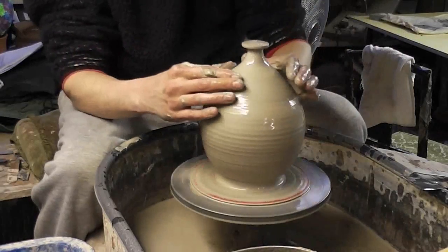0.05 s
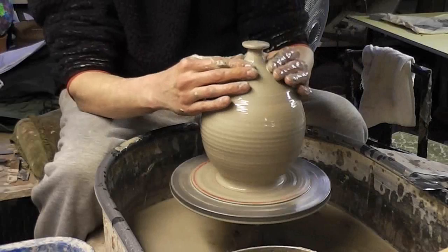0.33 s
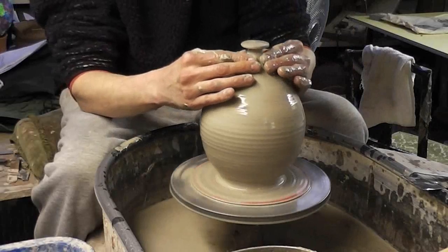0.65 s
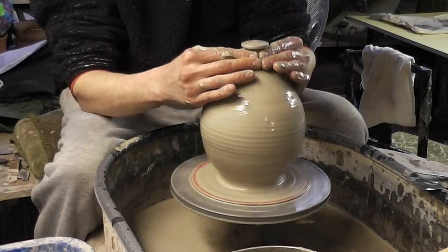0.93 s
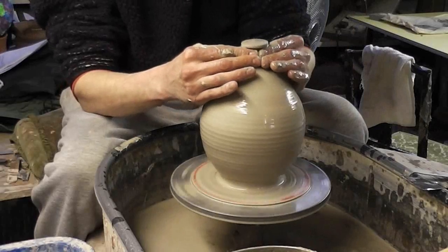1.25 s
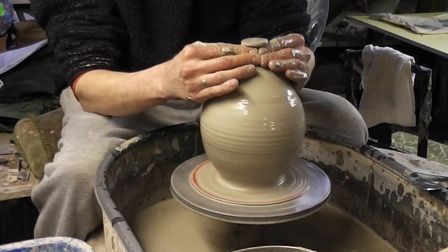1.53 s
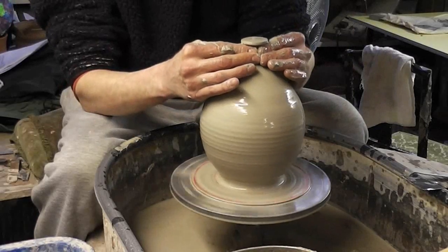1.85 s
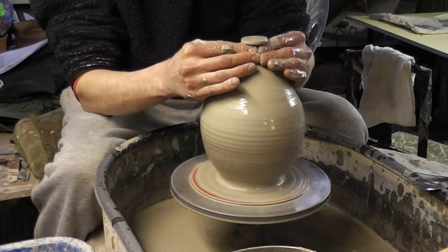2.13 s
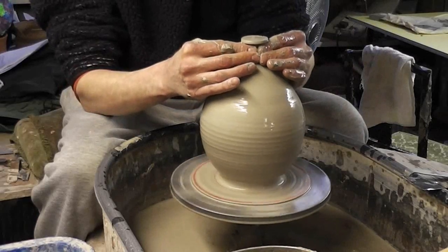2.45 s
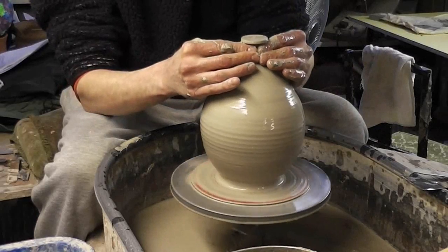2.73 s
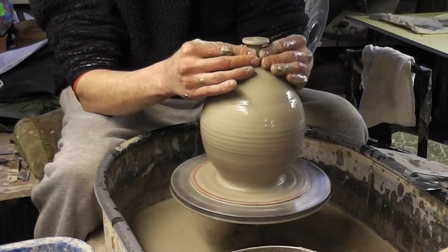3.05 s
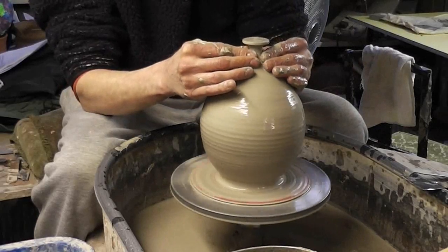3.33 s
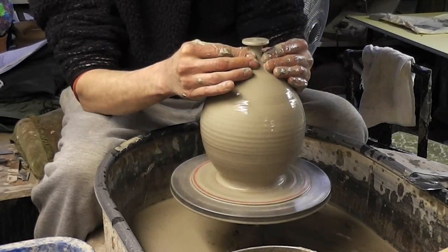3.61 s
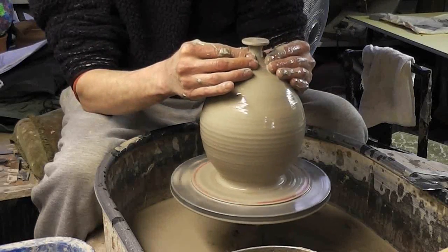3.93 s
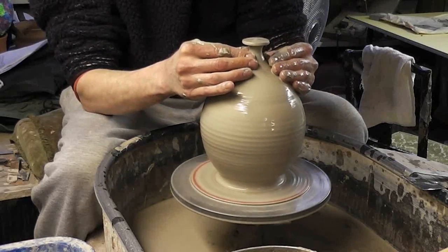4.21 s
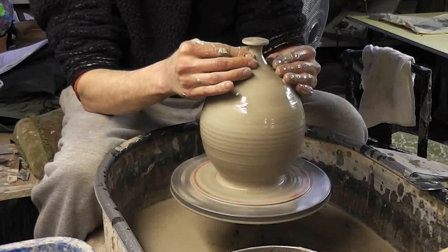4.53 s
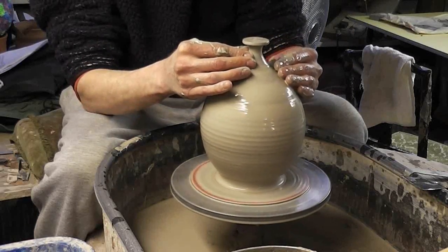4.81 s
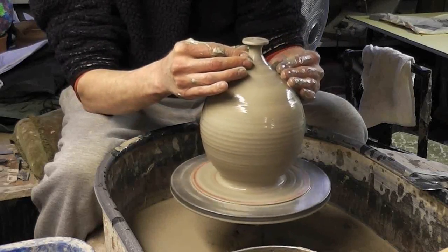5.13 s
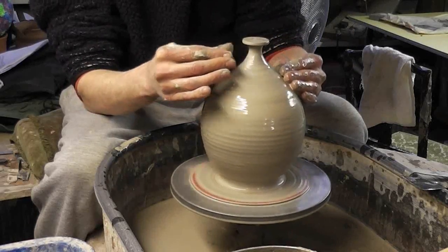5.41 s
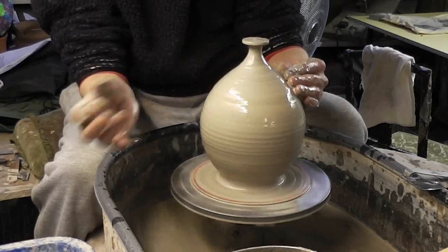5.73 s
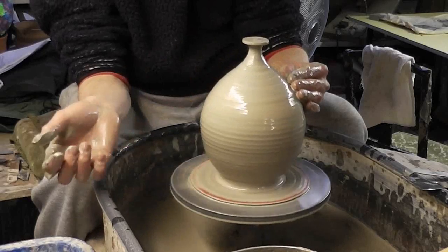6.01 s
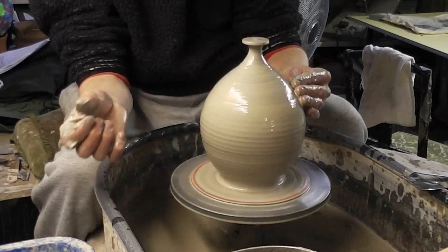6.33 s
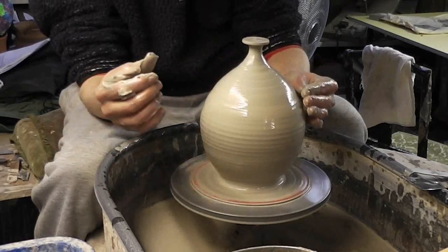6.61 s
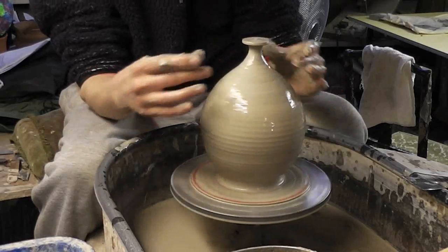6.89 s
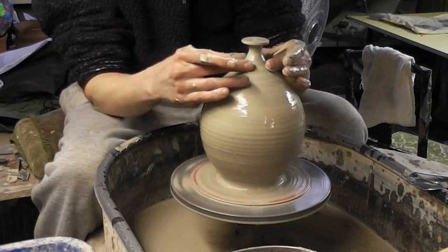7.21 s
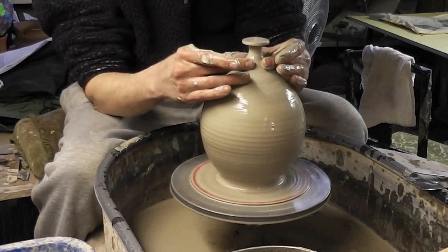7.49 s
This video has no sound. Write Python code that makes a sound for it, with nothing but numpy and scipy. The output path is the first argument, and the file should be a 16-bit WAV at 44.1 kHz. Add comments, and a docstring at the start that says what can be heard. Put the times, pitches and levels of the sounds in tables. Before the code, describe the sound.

An electric potter's wheel runs at a steady speed for the whole seven and a half seconds, close by in a small workshop. Its low motor hum has a slight throb, and the drive rumbles through the frame and tray, pulsing six or seven times a second with an occasional slightly stronger groan, clearest around 6.5 seconds. Much fainter, wet fingers slide on the spinning clay. A fine, crackly hiss with tiny wet ticks comes and goes during the first 1.5 seconds, then recedes. Brief soft scuffs and ticks follow, with a sharper tick at about 2.2 seconds and light rubs around 3 seconds and between 5 and 6 seconds. A duller scuff comes near 6.9 seconds, and the soft sliding returns until the end. The hand sounds carry a very short room echo, and a faint even hiss lies underneath.

```python
"""Electric potter's wheel at steady speed, close by, in a small workshop.
The motor hums at twice mains frequency with a slow throb. The drive rumbles through frame and tray,
swelling with each pulley turn. Wet fingers slide on the spinning clay: faint hiss, scuffs and ticks
of slip, with a short room tail. A steady hiss lies underneath."""
import sys
import numpy as np
from scipy import signal
from scipy.fft import irfft, next_fast_len
from scipy.io import wavfile
from scipy.ndimage import uniform_filter1d

SR = 44100
rng = np.random.default_rng(int(sys.argv[2]) if len(sys.argv) > 2 else 0)


def unload_wav(signal):
    """Save mono or channel-first audio to the path in sys.argv[1] as 16-bit WAV at rate SR, clipped to [-1, 1]."""
    wavfile.write(
        sys.argv[1],
        SR,
        np.round(np.clip(np.atleast_2d(signal).T, -1, 1) * 32767).astype(np.int16),
    )


N = 332955
TIME = np.arange(N) / SR
HUM_HZ, THROB_HZ, PULLEY_HZ, HEAD_HZ = 100.035, 4.665, 6.672, 1.84

# Motor hum: harmonic, level/dB, lag/rad, throb/dB, its peak t/s, ripple/dB, its peak t/s, head swell/dB
HUM_PARTIALS = [(1, -23, 0.24, 0.34, 0.038, 0.55, 0.028, -0.17),
                (3, -29.5, 1.68, 1.5, .21, 1.7, 0.055, 1.56), (4, -56, 1.2, 6, 0.12, 0, 0.031, -0.5)]
# Motor and drive tones: f/Hz, level/dB
DRIVE_TONES = [(79.2, -48), (84, -45), (93.3, -47.5), (113.4, -47), (114, -47.5), (142, -50), (981, -64),
               (1091, -61.5), (1185, -65.5), (1599, -71), (4339, -76.5), (7510, -87), (12500, -91)]
# Beating pair of housing tones: f/Hz, level/dB
HOUSING_TONES = [(195.4, -40), (200.2, -37)]
# Gain at the housing resonance: t/s, gain/dB
HOUSING_GAIN = [(0, 1), (.7, 2), (2.45, 4), (2.8, 1), (3.6, 1.5), (4.2, -3), (4.6, 0.5), (7.55, 2)]
# Frame and tray resonances: f/Hz, width/Hz, level/dB, swell per pulley turn/dB, its peak t/s
FRAME_MODES = [(110, 13, -44, -1, 0.02), (137, 19, -43, 1.5, 0.16), (179.5, 16, -41, 3, 0.07),
               (198.8, 12.3, -41.5, 4.5, 0.036), (217.3, 15, -40.5, -1.5, 0.068),
               (265, 33, -43.5, 0.5, 0.069), (307.4, 6.1, -36.5, 1.6, 0.034),
               (371.7, 16.4, -47.5, 1.1, .064), (407.3, 10, -54, -3, 0.076), (467, 16, -60, 9, 0.1),
               (607, 24.3, -49, 2, 0.05), (715, 30, -55, 8, 0.07), (855, 20, -59, 1.5, 0.086),
               (979, 14, -65, -2.5, .055), (1087, 79, -55.5, 2.5, 0.059), (1194, 24, -57.5, 5, 0.093),
               (1319, 15, -60.5, 0.5, 0.046), (1476, 24, -60.5, 0, 0.066), (1590, 14, -73, 2, 0.073),
               (3395, 60, -79, 5, 0.043), (4355, 90, -77.5, -2, 0.084), (6560, 160, -76.5, 0, .06),
               (7580, 260, -77, -0.5, 0.077)]
# Drag on the drive, slow part of the shake: t/s, relative level/dB
DRIVE_DRAG = [(0, 0), (2.5, -1.1), (3.3, 0), (4.1, 0), (5.4, 0.4), (7.55, 0)]
# Drive grinding: f/Hz, relative density/dB
GRIND_SPECTRUM = [(20, -18), (55, -2.5), (90, -3), (340, 5), (500, 0), (800, -5.5), (1400, -8.5),
                  (1800, -14.5), (2600, -25.5), (4300, -28), (4800, -45.5), (6300, -39), (9000, -45),
                  (16000, -53)]
# Tray groan: f/Hz, relative density/dB
GROAN_SPECTRUM = [(400, -30), (560, -9), (610, 3.5), (665, -4), (720, -9.5), (800, -18), (1300, -20.5),
                  (2500, -56.5), (16000, -91.5)]
# Hard pulley catches, louder groans: peak t/s, level/dB
PULLEY_CATCHES = [(.18, -42), (1.11, -39), (1.99, -41), (3.17, -41), (3.47, -41), (5.27, -40), (6.48, -36),
                  (6.92, -40)]
# Stereo image of wheel and hands: f/Hz, left-right correlation
STEREO_CORRELATION = [(30, .85), (100, 0.94), (300, 0.98), (600, 0.94), (1200, 0.85), (2200, 0.67),
                      (4000, 0.62), (8000, 0.25)]
# Fingers sliding on clay: t/s, level/dB
SLIDE_LEVEL = [(0, -56), (.2, -60), (.35, -63), (.5, -71), (1.0, -68), (1.25, -62), (1.5, -78.5),
               (6.6, -77), (7.0, -69), (7.55, -64)]
# Wet skin friction: f/Hz, relative density/dB
SLIDE_SPECTRUM = [(1500, -19.5), (3500, 3.5), (4900, -2), (6500, 0.5), (9000, -3), (12000, -4), (16000, -9)]
# Snapping films of slip: t/s, level/dB, f/Hz, half-width/oct, T60/s
SLIP_TICKS = [(.077, -38.5, 9500, .35, 0.013), (.212, -44, 7200, .16, .025), (.242, -45, 11000, .22, .025),
              (.600, -44, 7650, 0.26, .03), (.619, -44, 10600, .55, .018), (.704, -42.5, 5970, 0.58, .06),
              (.792, -48, 10000, 0.63, .025), (1.247, -48, 7660, .18, .03), (1.31, -52, 5000, .25, .04),
              (1.736, -52, 10400, .16, .03), (2.244, -34.5, 11400, 0.85, .012),
              (2.244, -44.5, 6150, 0.2, 0.073), (3.025, -54, 10400, .14, .04),
              (3.141, -47, 9500, .5, 0.023), (5.005, -48, 6000, .8, .05), (6.906, -53, 7200, .25, .05),
              (7.043, -49, 7900, .1, .03)]
# Distinct hand scuffs: t/s, level/dB, decay/s, tilt/(dB/oct)
HAND_SCUFFS = [(0.884, -46, 0.0097, -7), (0.914, -49, .025, -10), (1.216, -50, .045, -7),
               (1.606, -49, 0.039, -7), (1.965, -50, 0.015, -6), (2.091, -50, 0.042, -5.5),
               (3.0, -46, 0.031, -11), (3.454, -50.5, 0.017, -3), (4.379, -52.5, 0.052, -3),
               (4.504, -50, .025, -5), (4.995, -53, 0.049, -4), (5.257, -46.5, 0.02, -4.5),
               (5.311, -45, 0.046, -7), (5.894, -49, .03, -7), (6.041, -49, .03, -21),
               (6.454, -51, .025, -4), (6.625, -55, 0.036, -1.5), (6.903, -47.5, .03, -7),
               (6.935, -39, 0.032, -24)]
# Scuff before tilt: f/Hz, relative density/dB
SCUFF_SPECTRUM = [(400, -9), (1200, 3), (2500, 2), (4200, 1.5), (4900, -6), (6500, 1.5), (10000, -4.5),
                  (16000, -15)]
# Background hiss: f/Hz, relative density/dB
HISS_SPECTRUM = [(100, 4), (2000, -4), (4300, 4.5), (4900, -0.5), (5600, 4), (7100, 0), (7600, 2.5),
                 (8500, -1), (12300, -2), (12900, 1.5), (13600, -3), (16000, -1.5)]


def motor(lag_peak_s=0.1204, head_load_s=0.069):
    """Magnetic hum, swinging in phase and level with each throb, plus drive and housing tones."""
    sag = ((1 + cycle(THROB_HZ, lag_peak_s)) / 2) ** 4
    out = np.zeros(N)
    for harmonic, db, lag_rad, throb_db, throb_s, ripple_db, ripple_s, head_db in HUM_PARTIALS:
        swing_db = throb_db * cycle(THROB_HZ, throb_s) + ripple_db * cycle(2 * THROB_HZ, ripple_s)
        swing_db += head_db * cycle(HEAD_HZ, head_load_s)
        out += amp(db + swing_db) * np.cos(2 * np.pi * harmonic * HUM_HZ * TIME - lag_rad * sag)
    for hz, db in DRIVE_TONES + HOUSING_TONES:
        out += amp(db) * housing(hz) * np.sin(2 * np.pi * (hz * TIME + rng.random()))
    return np.sqrt(2) * out


def housing(hz, centre_hz=198, width_hz=40, swell_db=0.9, peak_s=0.19):
    """Gain near the housing resonance; swells once per wheel-head turn."""
    level_db = curve(HOUSING_GAIN) + swell_db * cycle(HEAD_HZ, peak_s)
    return amp(level_db * np.exp(-((hz - centre_hz) / width_hz) ** 2))


def pulley_shake(depth=0.8):
    """Rolling-contact level swing in dB: drag, random lumps, a rough surface repeating each turn."""
    drag = curve(DRIVE_DRAG) + 1.39 * wander(top_hz=5)
    jolts = uniform_filter1d(uniform_filter1d(rng.standard_normal(N), size=900), size=400)
    lumps = unit(jolts - uniform_filter1d(jolts, size=3500))  # shorter than a turn
    surface = unit(sum(cycle(k * PULLEY_HZ, rng.random()) / np.sqrt(k) for k in range(5, 32)))
    ripple = 1.5 * cycle(16 * PULLEY_HZ, 0)
    return depth * (drag + lumps + surface + ripple)


def frame(shake_db, full_shake_hz=800):
    """Frame and tray modes, each peaking at its own point of the pulley turn; high ones shake most."""
    out = np.zeros((2, N))
    smooth_db = uniform_filter1d(shake_db, size=800)  # ringing smooths fast jolts
    for hz, width_hz, db, swell_db, peak_s in FRAME_MODES:
        ring = noise(lambda f: 1 / np.sqrt(1 + (2 * (f - hz) / width_hz) ** 4))
        swing_db = swell_db * cycle(PULLEY_HZ, peak_s) + smooth_db * min(hz / full_shake_hz, 1)
        out += amp(db) * housing(hz) * ring * unit(amp(swing_db))
    return out


def grind(shake_db, level_db=-38.5, swell_db=1.23, peak_s=0.051):
    """Broadband drive noise; swells once per pulley turn."""
    swing_db = shake_db + swell_db * cycle(PULLEY_HZ, peak_s)
    return amp(level_db) * unit(noise(lambda f: amp(lookup(GRIND_SPECTRUM, f))) * amp(swing_db))


def groans(level_db=-47.5, spread_db=2, first_s=0.038, jitter_s=0.011, length_s=0.08):
    """Tray resonance: one rough burst per pulley turn, louder at the catches."""
    turns_s = first_s + np.arange(int(N / SR * PULLEY_HZ) + 1) / PULLEY_HZ
    scatter = rng.uniform(-np.sqrt(3), np.sqrt(3), (len(turns_s), 2))  # unit variance
    bursts = [(s + jitter_s * late, level_db + spread_db * loud)
              for s, (late, loud) in zip(turns_s, scatter)]
    power, swell = np.zeros((1, N)), np.hanning(round(length_s * SR))[None]
    for s, db in bursts + PULLEY_CATCHES:
        add(power, s - length_s / 2, (amp(db) * swell) ** 2)
    return np.sqrt(power) * noise(lambda f: amp(lookup(GROAN_SPECTRUM, f)))


def slide(grain_db=2.5):
    """Wet skin on clay: fine, crackling hiss."""
    grains = unit(uniform_filter1d(rng.standard_normal(N), size=70))
    friction = noise(lambda f: amp(lookup(SLIDE_SPECTRUM, f)))
    return amp(curve(SLIDE_LEVEL)) * unit(friction * amp(grain_db * grains))


def ticks(rise_s=0.001, size=6000):
    """Films of slip snap: short, high noise bursts."""
    out, t = np.zeros((2, N)), np.arange(size) / SR
    for s, db, hz, width_oct, t60_s in SLIP_TICKS:
        burst = noise(lambda f: 1 / (1 + (np.log2((f + 1) / hz) / width_oct) ** 4), size=size)
        envelope = (1 - np.exp(-t / rise_s)) * np.exp(-np.log(1000) * t / t60_s)
        add(out, s, amp(db) * burst * envelope)
    return out


def scuffs(faint_per_s=1.5, faint_db=-54.5, faint_decay_s=0.017, faint_db_per_oct=-2,
           pivot_hz=3000, rise_s=0.00085, size=12000):
    """Hands rub the clay briefly; fainter rubs fall at random times."""
    out, t = np.zeros((2, N)), np.arange(size) / SR
    onsets_s = TIME[rng.random(N) < faint_per_s / SR]
    faint = [(s, faint_db, faint_decay_s, faint_db_per_oct) for s in onsets_s]
    for s, db, decay_s, db_per_oct in HAND_SCUFFS + faint:
        def colour(f):
            octaves = np.log2(np.maximum(f, pivot_hz / 2) / pivot_hz)
            return amp(lookup(SCUFF_SPECTRUM, f) + db_per_oct * octaves)
        envelope = (1 - np.exp(-t / rise_s)) * np.exp(-(t / decay_s) ** 2)
        add(out, s, amp(db) * noise(colour, size=size) * envelope)
    return out


def room(x, t60_s=0.19, predelay_s=0.004, density=0.06, size=12000):
    """Short tail of sparse reflections, different at each ear."""
    t = np.arange(size) / SR
    taps = rng.standard_normal((2, size)) * (rng.random((2, size)) < density) * (t > predelay_s)
    taps *= np.exp(-np.log(1000) * t / t60_s)
    return signal.fftconvolve(x, taps / np.linalg.norm(taps[0]), axes=1)[:, :N]


def hiss(level_db=-59, correlation=0.077):
    """Steady, wide background hiss."""
    return amp(level_db) * noise(lambda f: amp(lookup(HISS_SPECTRUM, f)), [(0, correlation)])


def noise(colour, correlation=STEREO_CORRELATION, size=N):
    """Unit-rms stereo noise with spectral gain colour(hz)."""
    length = next_fast_len(size, True)
    hz = np.fft.rfftfreq(length, 1 / SR)
    mid, side = rng.standard_normal((2, 2 * len(hz))).view(complex)
    rho = np.clip(lookup(correlation, hz), -1, 1)
    mid, side = mid * np.sqrt(1 + rho), side * np.sqrt(1 - rho)
    spectrum = np.array([mid + side, mid - side]) * colour(hz)
    return unit(irfft(spectrum, length)[:, :size])


def wander(top_hz, count=24):
    """Unit-rms random drift, rates up to top_hz."""
    t = np.append(TIME[::100], TIME[-1])
    rates_hz = np.linspace(top_hz / count, top_hz, count)
    waves = sum(np.cos(2 * np.pi * (hz * t + rng.random())) for hz in rates_hz)
    return unit(np.interp(TIME, t, waves))


def cycle(hz, peak_s):
    """Cosine peaking at peak_s."""
    return np.cos(2 * np.pi * hz * (TIME - peak_s))


def lookup(rows, hz):
    """Spectrum table at hz, log-frequency interpolation."""
    f, value = np.transpose(rows)
    return np.interp(np.log(hz + 1), np.log(f + 1), value)


def curve(rows):
    """Time table at every sample."""
    return np.interp(TIME, *np.transpose(rows))


def amp(db):
    """dB to gain."""
    return 10 ** (np.asarray(db) / 20)


def unit(x):
    """Scale to unit rms."""
    return x / np.sqrt(np.mean(x ** 2) + 1e-20)


def add(mix, start_s, sound):
    """Mix sound in at start_s."""
    part = mix[:, max(round(start_s * SR), 0):][:, :sound.shape[1]]
    part += sound[:, :part.shape[1]]


def scene(left_db=1.5, room_db=-7):
    """Wheel slightly left, hands with room tail, hiss."""
    shake_db = pulley_shake()
    wheel = motor() + frame(shake_db) + grind(shake_db) + groans()
    pan = amp([[left_db / 2], [-left_db / 2]])
    hands = slide() + ticks() + scuffs()
    return wheel * pan + hands + hiss() + amp(room_db) * room(hands)


def record(dry, cutoff_hz=15780):
    """Steep low-pass."""
    lowpass = signal.firwin(1023, cutoff_hz, window=("kaiser", 9), fs=SR)
    return signal.oaconvolve(dry, lowpass[None], "same")


dry = scene()
out = record(dry)
unload_wav(out)
```